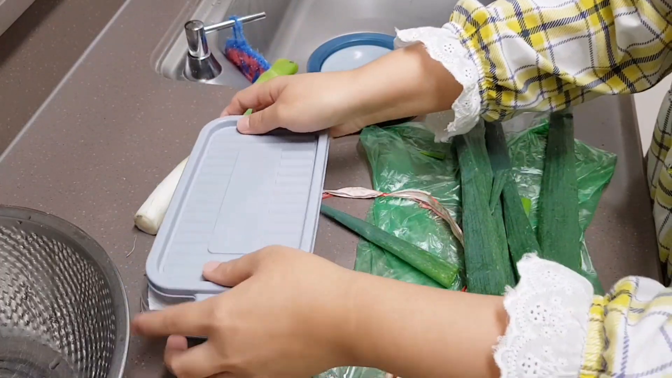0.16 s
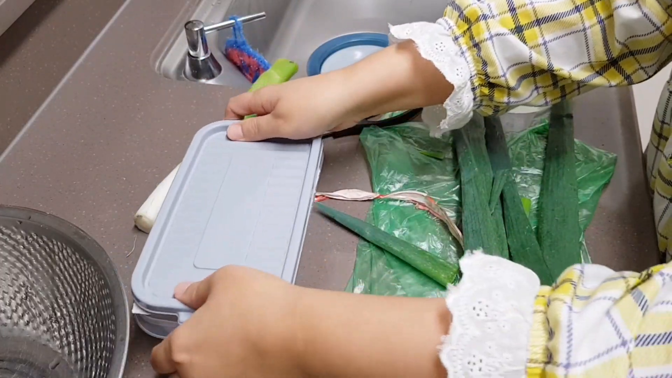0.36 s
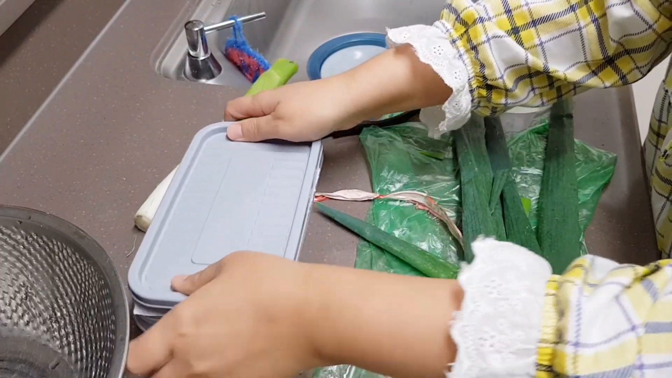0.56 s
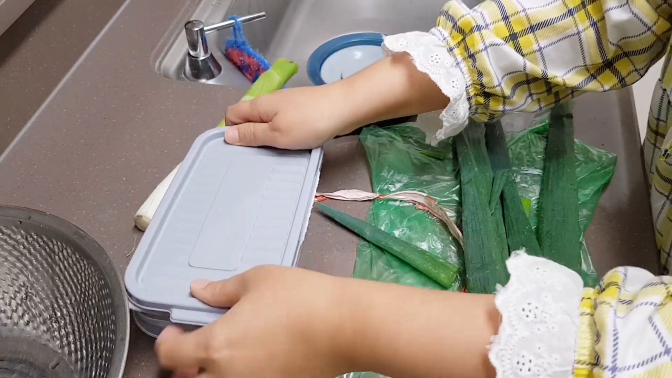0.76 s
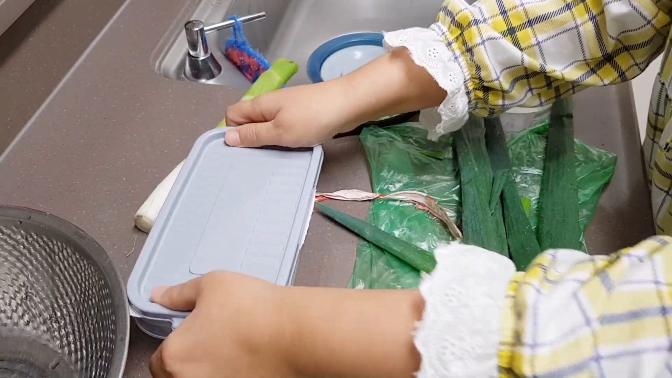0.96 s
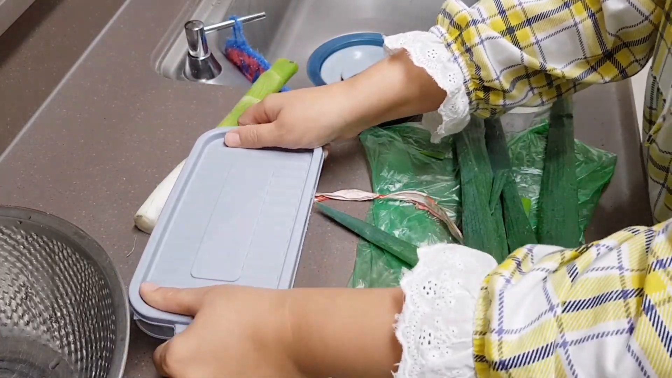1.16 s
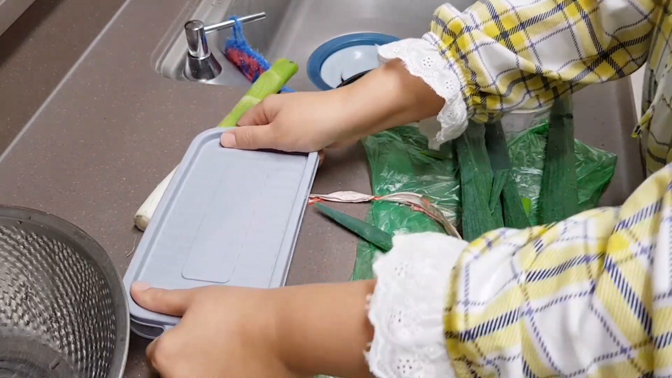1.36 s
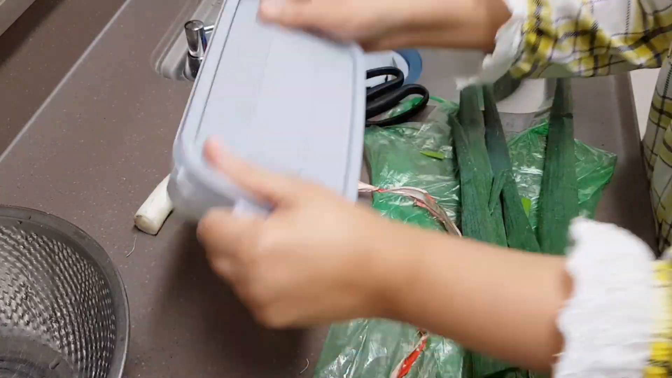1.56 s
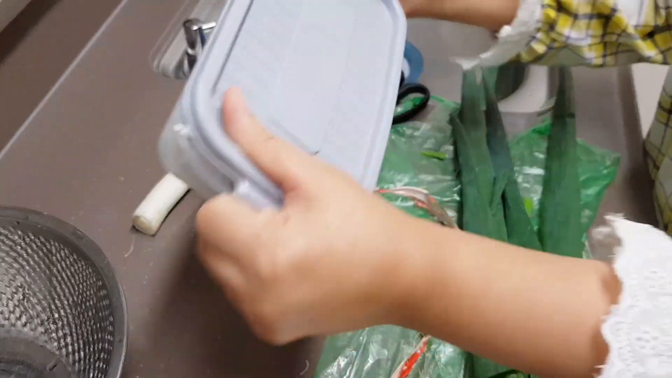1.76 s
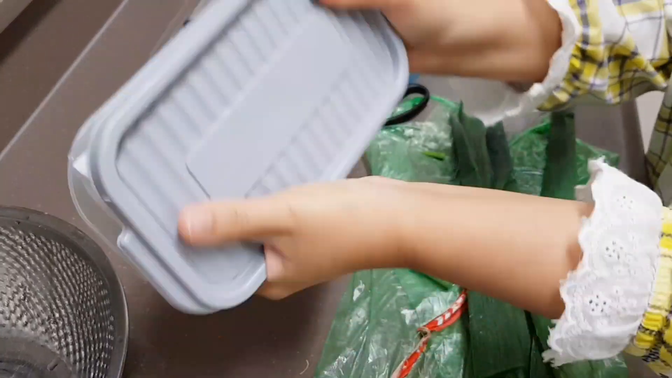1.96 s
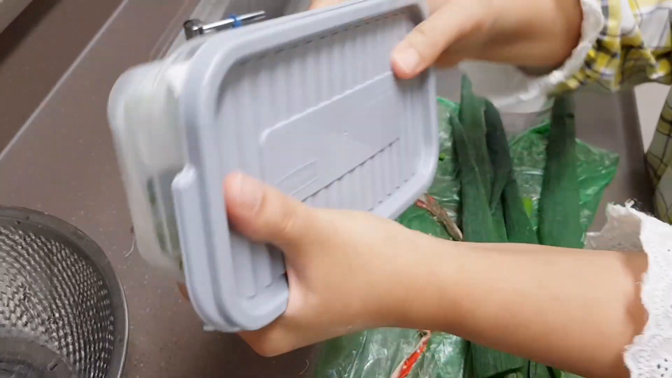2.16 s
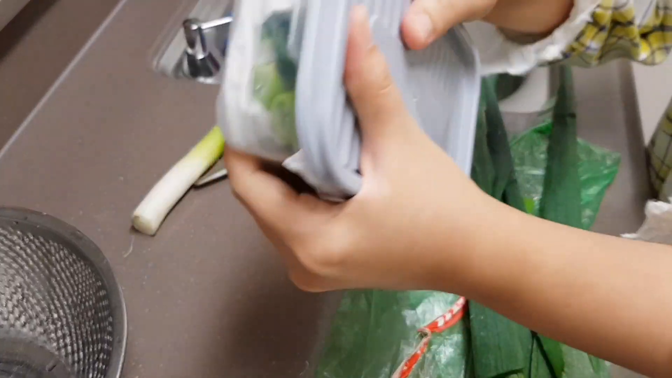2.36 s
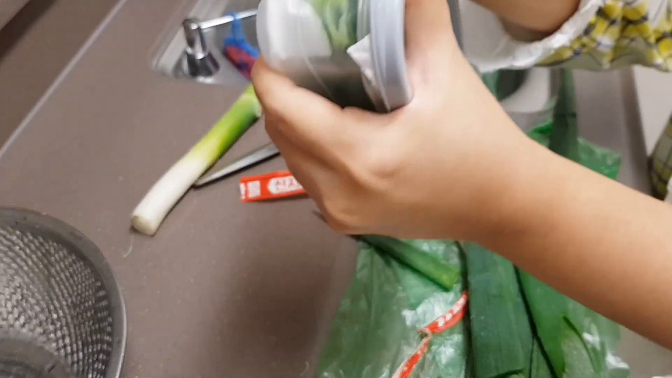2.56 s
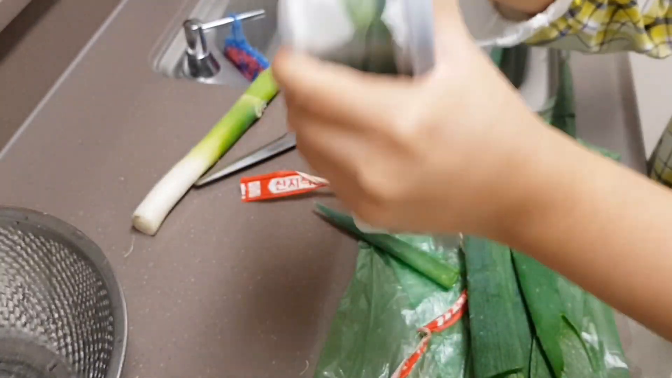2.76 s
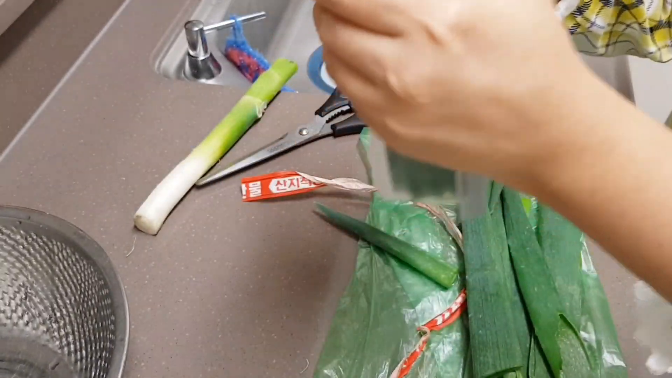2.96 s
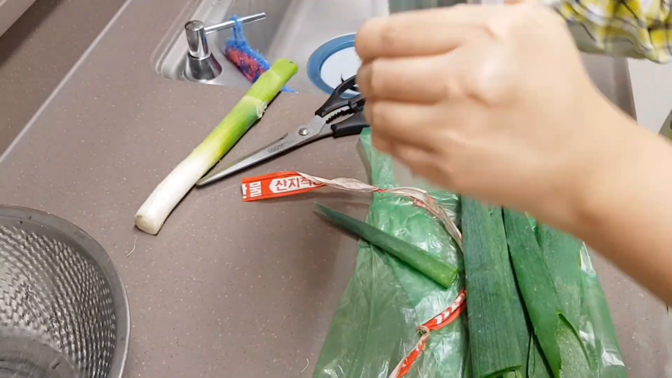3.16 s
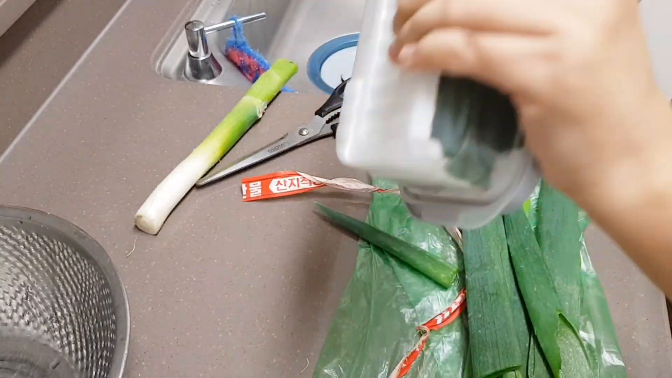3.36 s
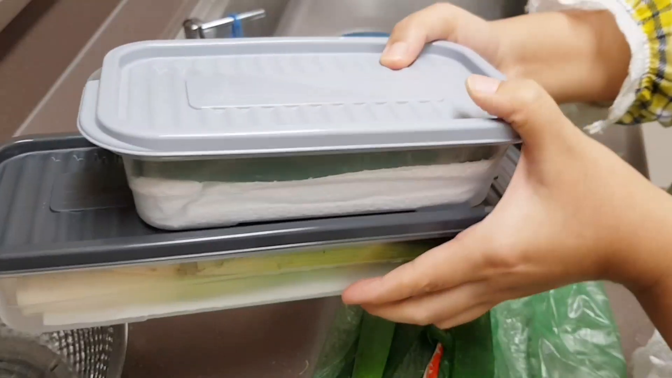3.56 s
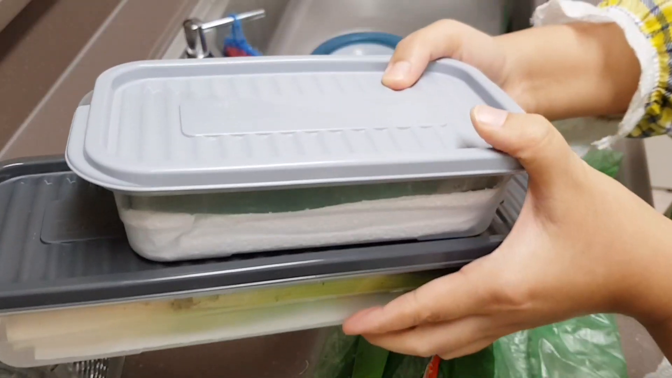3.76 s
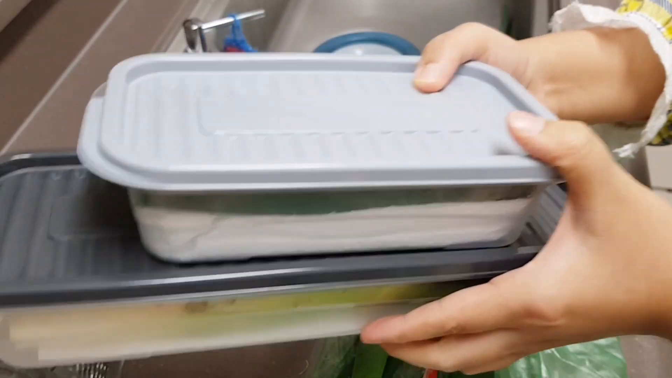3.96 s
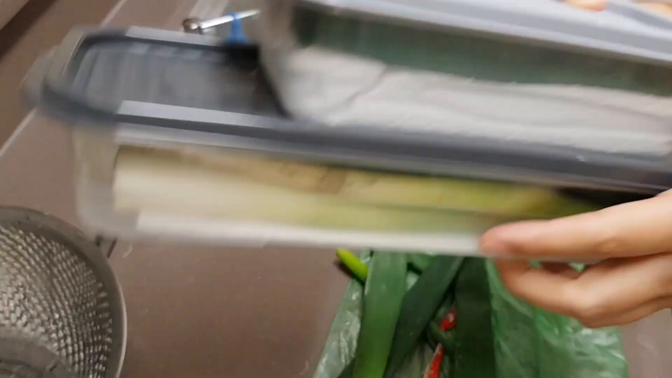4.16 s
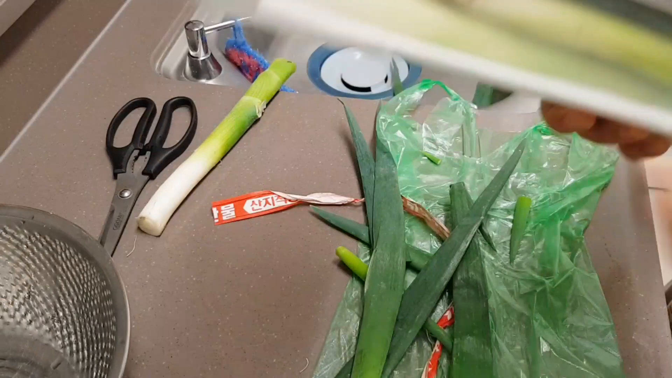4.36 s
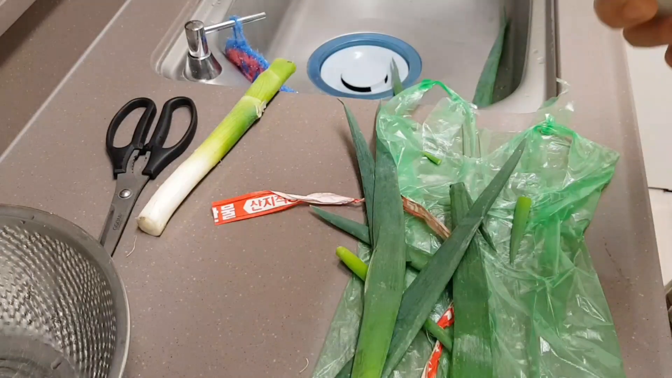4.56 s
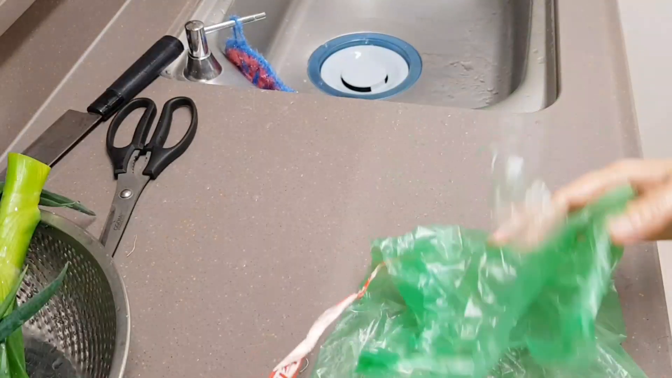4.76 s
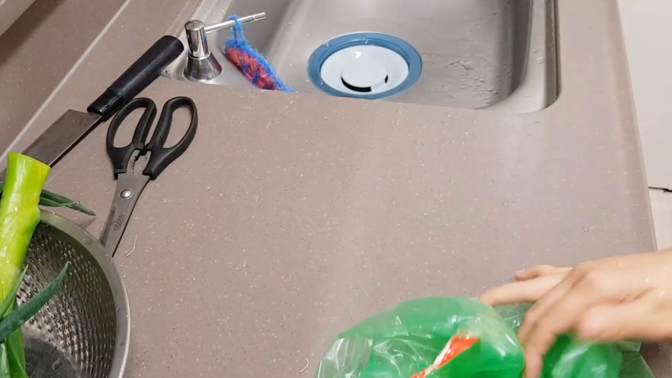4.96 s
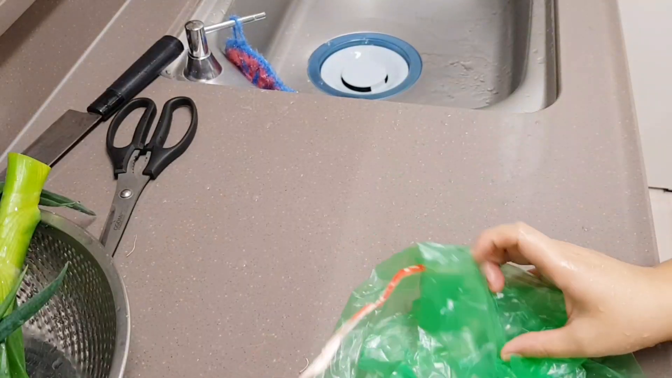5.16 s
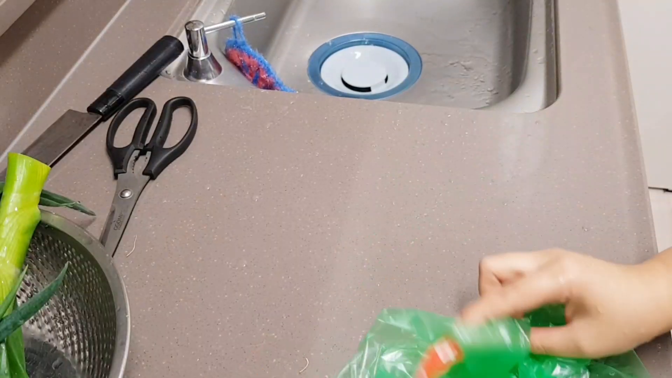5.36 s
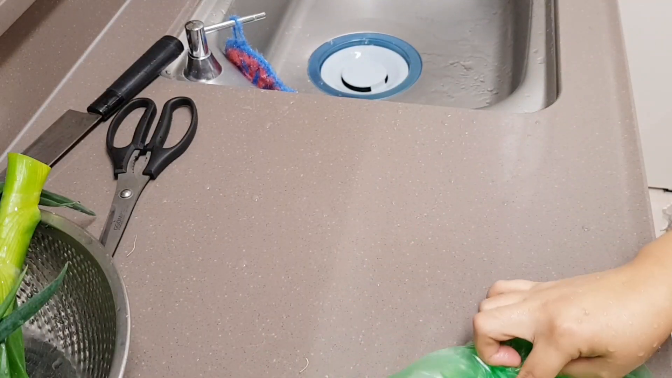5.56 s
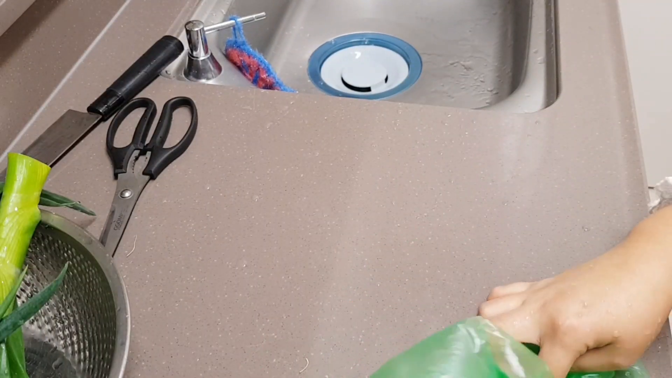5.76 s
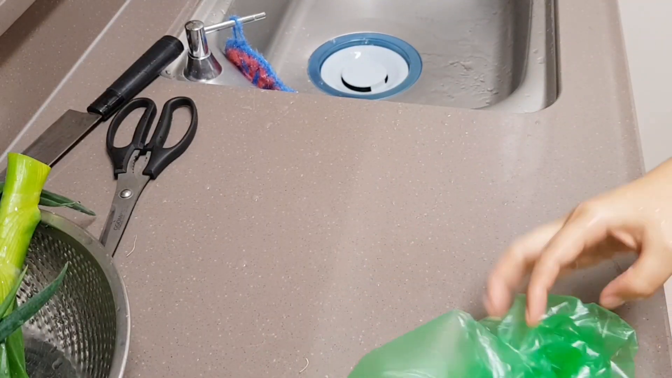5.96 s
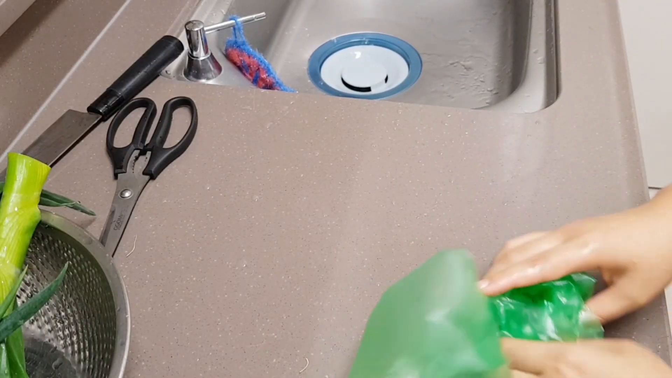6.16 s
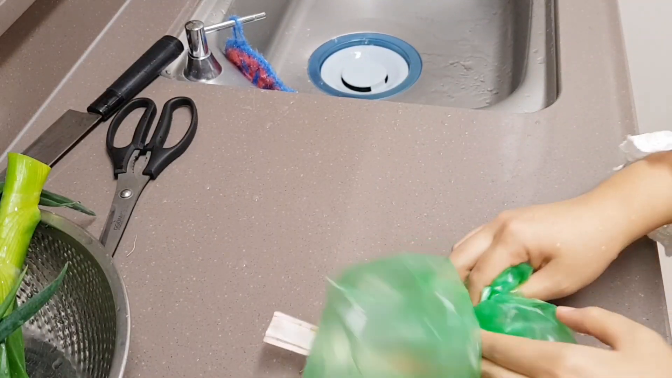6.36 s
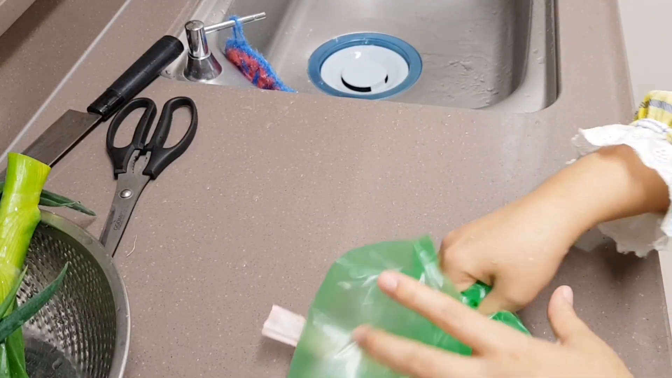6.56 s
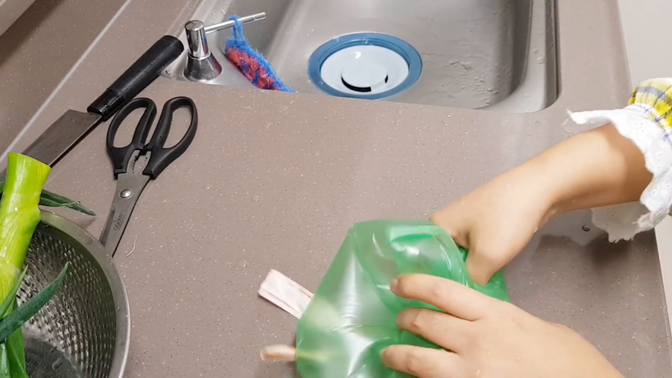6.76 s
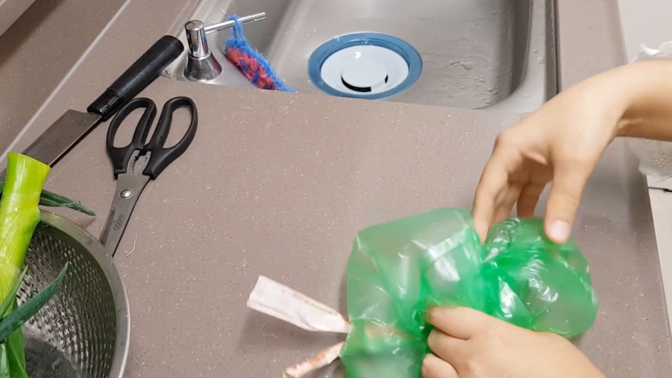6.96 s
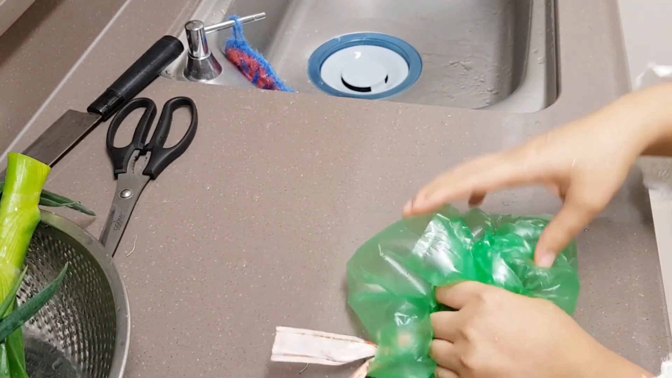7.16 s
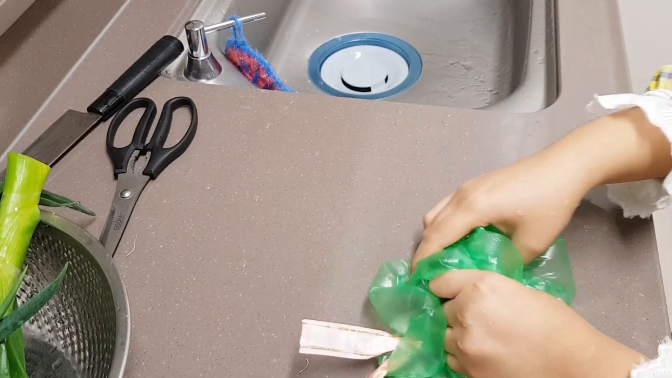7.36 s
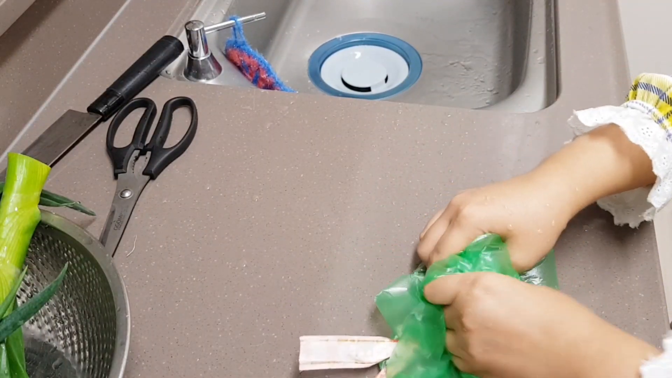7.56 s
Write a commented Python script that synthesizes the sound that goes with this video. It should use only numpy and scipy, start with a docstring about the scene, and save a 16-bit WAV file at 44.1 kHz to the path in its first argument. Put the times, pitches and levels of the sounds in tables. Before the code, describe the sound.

A small hard kitchen with low hum and faint hiss, heard closely, leaning slightly left. From 0 to 0.7 seconds sleeves and fingers brush softly over a low rumble, with faint dull bumps. At 0.73 a plastic lid latches with a hollow clack, jolting a steel utensil that chatters and rings briefly. Smaller knocks follow to 1.1, then rubbing and swishing around 1.2 to 1.6. Between 1.75 and 2.8 the box is turned, with thumps, short clacks and brisk swishes, a sharp one near 2.55. From 3 it is nearly quiet, only faint brushes, with tiny total dropouts at 3.52 and 4.81. Then a thin plastic bag crackles close by, in dense bright snaps, squeezed repeatedly, stronger from 5.9, with low crunches and air puffs heaviest around 6.7 to 7.1 and another crunch at 7.45, still crackling at the end.

```python
"""A plastic box of cut green onions is latched shut, lifted and turned over at a kitchen counter.
Knocks set off decaying tones and noise; a steel utensil rings once; bursts of tiny snaps make sleeves and
fingers brush along, joined by short swells of noise at one pitch. After two short silent gaps a thin plastic
bag is crumpled close by, as a dense stream of snaps. A small hard room answers, over rumble, hum and hiss."""
import sys
import numpy as np
from scipy import signal
from scipy.fft import rfft, irfft, next_fast_len
from scipy.io import wavfile
from scipy.ndimage import uniform_filter1d, map_coordinates

SR = 44100
rng = np.random.default_rng(int(sys.argv[2]) if len(sys.argv) > 2 else 0)


def pcm_store(signal):
    """Save signal as 16-bit PCM."""
    levels = np.round(np.clip(np.atleast_2d(signal), -1, 1) * 32767)
    wavfile.write(sys.argv[1], SR, levels.astype(np.int16).T)


N = 335589
TIME = np.arange(N) / SR  # seconds since the start
AGE = np.arange(SR // 2) / SR  # seconds since a single blow
TOP_HZ = 16100  # nothing is heard above this

# Latches and knocks on the box. Each row: start in seconds, level in dB before a shared trim, clack pitch in Hz,
# seconds for the ring to fall 60 dB, then thump, hollow, click and slide, each in dB over the level.
KNOCKS = [(0.728, -30, 1310, 0.21, -17.5, -.5, -13, -40.5), (0.841, -41.5, 980, 0.17, 0.5, 0.5, -1, -29),
          (1.045, -58, 960, 0.25, -18, -5, -11, -26), (1.116, -40.5, 1030, 0.11, -17, -5, -11.5, -15.5),
          (1.755, -42, 1030, 0.3, 2.5, 0, -1.5, -20), (1.786, -33, 1580, .086, -5.5, -5.5, -13, -21.5),
          (1.933, -39, 713, 0.22, -1.5, -8, -9, -32), (1.992, -40.5, 1190, .15, 11.5, -1, 8.5, -5.5),
          (2.136, -57.5, 890, .12, 11.5, 5.5, 6, -8), (2.362, -37.5, 1360, 0.052, -6.5, 6, 0, -28.5),
          (2.373, -38.5, 1480, 0.071, -7.5, 5.5, 4.5, -29), (2.546, -27.5, 1990, 0.073, -6, -4, -4, -32.5),
          (2.783, -37.5, 1400, 0.069, 0, -12, 2, -35), (2.925, -53, 1450, 0.13, -21, 1, 6.5, -17.5),
          (3.124, -53, 1500, 0.17, -17, -3.5, -0.5, -0.5)]
# Tones of the box and its lid. Each row: pitch in Hz, typical strength in dB (each blow varies it),
# seconds to fall 60 dB in an ordinary grip.
BOX_MODES = [(346.5, 5.5, 0.031), (378.1, -2, 0.12), (434, 9.5, 0.0077), (545, -12, 0.12), (745, -9, 0.087),
             (861, -0.5, 0.0532), (1080, -7.5, 0.013), (1210, -14.5, 0.12), (1370, 1.5, 0.024),
             (1674, -12.5, 0.18), (1950, -9.5, 0.16), (2007, -26.5, 0.073), (2500, -28, 0.051),
             (2670, -28, 0.039)]
# Box and hands bump softly on the counter. Each row: start in seconds, pitch in Hz, level in dB,
# seconds to fall 60 dB.
BUMPS = [(0.435, 82, -54.5, 0.58), (0.547, 85.5, -52, 0.35), (0.594, 80, -52, 0.35),
         (0.962, 67.8, -47, 0.13), (5.89, 87, -51.5, 0.42), (6.13, 71, -52, 0.27)]
THUMP_HZ, THUMP_DB_PER_OCTAVE = 203.8, 32.5  # a heavier thump is lower
# a loose grip lets the box ring on and the rim rattle
RATTLE_DB, RATTLE_DB_PER_DOUBLING, LOOSE_T60_S = -4.5, 9, 0.14
BOX_LEFT_DB = 2.5  # on top of the lean shared by the hands


def box():
    """Each blow thumps the contents, rings the hollow box and its lid, and clicks at the rim."""
    track = np.zeros((2, N))
    for s, db, clack_hz, t60, thump_db, hollow_db, click_db, _ in KNOCKS:
        loose = t60 / LOOSE_T60_S
        # every blow finds the tones at new strengths; the grip sets how long they ring
        shell = 0
        for hz, mode_db, life in BOX_MODES:
            strength = rng.choice([-1, 1]) * amp(mode_db + rng.normal(0, 5.0))
            shell = shell + strength * ring(hz, life * loose)
        thump_hz = THUMP_HZ * 2 ** (-thump_db / THUMP_DB_PER_OCTAVE)
        thump = band(ring(thump_hz, 0.053) + 3 * dying(0.095)[0], 54, 270)
        hollow = band(shell + 2.1 * dying(t60)[0], 270, 570)
        clack_mix = shell + 3 * dying(t60) + 6 * dying(0.0057)[0]
        clack = band(clack_mix, clack_hz / 1.64, clack_hz * 1.47)
        # the rim clicks and may rattle on
        rattle_db = RATTLE_DB + RATTLE_DB_PER_DOUBLING * np.log2(loose)
        rim = band(dying(0.0059) + amp(rattle_db) * dying(0.11), 3100, 14000)
        click = signal.lfilter([.6], [1, -.5], rim)  # the soft plastic rounds off the top
        blow = clack + amp(thump_db) * thump + amp(hollow_db) * hollow + amp(click_db) * click
        add(track, s, amp(db - 4.5) * blow)
    for s, hz, db, t60 in BUMPS:
        soft_start = 1 - np.exp(-AGE / 0.0042)
        add(track, s, amp(db) * ring(hz, t60) * soft_start)
    return kitchen(track * sides(BOX_LEFT_DB), wet_db=-9.5)


# Tones of the steel utensil. Each row: pitch in Hz, level in dB at the blow, seconds to fall 60 dB.
STEEL_TONES = [(970, -25, 0.12), (1480, -46, 0.74), (1720, -39, 0.28), (1870, -39, 0.46), (2050, -48, 0.39),
               (2230, -34.5, 0.32), (2510, -40.5, 0.3), (3070, -39, 0.25), (3370, -56.5, .26),
               (3920, -37.5, 0.18), (4110, -40, 0.25), (4570, -65.5, .16)]


def steel():
    """The first latch jolts a steel utensil, which chatters and rings on as damped tones."""
    shared_phases = rng.uniform(0, 2 * np.pi, (len(STEEL_TONES), 1, 1))
    phases = shared_phases + rng.normal(0, 0.47, (len(STEEL_TONES), 2, 1))  # left and right differ a little
    tones = 0
    for (hz, db, t60), phase in zip(STEEL_TONES, phases):
        tones = tones + amp(db - 60 * AGE / t60) * np.sin(2 * np.pi * hz * AGE + phase)
    chatter = amp(-33.0) * band(dying(0.21), 1500, 5000)
    soft_start = 1 - np.exp(-AGE / 0.0033)
    track = np.zeros((2, N))
    add(track, KNOCKS[0][0], (tones + chatter) * soft_start * sides(2.8))
    return track


# Strokes of sleeves and fingers. Each row: peak time in seconds, half length in seconds,
# swish level in dB, rub in dB over the swish, both before shared trims.
STROKES = [(0.107, 0.061, -64, -2), (0.397, .02, -66, 13), (0.467, 0.035, -57, 9), (0.702, .03, -65.5, 2.5),
           (0.915, 0.059, -74.5, 19), (1.19, 0.074, -61, 9), (1.324, 0.0083, -62, -10),
           (1.453, 0.043, -52.5, 3), (1.585, 0.048, -53, -9), (2.24, .05, -60, -2.5),
           (2.324, .05, -55, -13), (2.405, .025, -52.5, -5), (2.501, 0.044, -51, -2),
           (2.647, 0.049, -53, -30), (2.768, .018, -60, -22), (2.924, .022, -55.5, -20),
           (3.331, .04, -65.5, -0.5), (3.474, 0.067, -66.5, 1), (4.194, 0.046, -68, 5),
           (4.373, 0.082, -75.5, 2), (4.657, .035, -68.5, 7)]
# Colour of the bright swish. Each row: pitch in Hz, relative level in dB.
SWISH = [(1200, -10.5), (2200, 2.5), (3200, 0), (4600, 5.5), (7000, 8), (9300, 2.5), (13000, 6.5),
         (16000, -1.5)]
# Colour of the dull rub. Each row: pitch in Hz, relative level in dB.
RUB = [(150, -4.5), (280, -4), (480, 2.5), (750, -5), (1200, -8.5), (1900, -10.5), (2800, -19.5),
       (4000, -23.5), (7000, -50.5)]
SLIDE_DELAY_S, SLIDE_HALF_S, SLIDE_RUB_DB = 0.054, 0.032, -11.5  # stalks and fingers settle after a knock
# faint random brushing while the hands work, before the shared trims
FIDGET_DB, FIDGET_RUB_DB, FIDGET_SWING_DB, FIDGET_PER_S = -76, 10, 0.5, 7
# then the faint random brushing fades out and only separate strokes remain
FIDGET_END_S, FIDGET_FADE_S = 3.09, 0.27
SLEEVES_LEFT_DB = 2.5  # on top of the lean shared by the hands


def sleeves():
    """Cloth, fingers and stalks brush the box in fine slips: in strokes, after each knock and faintly between."""
    slides = [(s + SLIDE_DELAY_S, SLIDE_HALF_S, db + slide_db, SLIDE_RUB_DB) for s, db, *_, slide_db in KNOCKS]
    busy = np.clip((FIDGET_END_S - TIME) / FIDGET_FADE_S + 1, 0, 1)
    swish_power = (busy * amp(FIDGET_DB + FIDGET_SWING_DB * wobble(FIDGET_PER_S))) ** 2
    rub_power = swish_power * amp(FIDGET_RUB_DB) ** 2
    for s, half, db, rub_db in STROKES + slides:
        power = (amp(db) * swell(s, half)) ** 2
        swish_power = swish_power + power
        rub_power = rub_power + power * amp(rub_db) ** 2
    slips = grains(rate=7000, spread_db=-1.0) * amp(1.8 * wobble(60))
    slips = patchy(slips, depth_db=3.5, per_second=28)
    swish = amp(3) * np.sqrt(swish_power) * coloured(slips, SWISH)
    rub = amp(-0.7) * np.sqrt(rub_power) * coloured(slips, RUB)
    return kitchen(swish + rub, wet_db=-9.5) * sides(SLEEVES_LEFT_DB) * (TIME < GAPS[1][1])


# Short swells at one pitch: judders on the plastic, the hollow box sounding again, the bright edge of a stroke.
# Each row: peak time in seconds, half length in seconds, pitch in Hz, level in dB.
PITCHED_SWELLS = [(0.134, 0.021, 1670, -64), (0.397, .04, 746, -56.5), (0.456, 0.0073, 1950, -56),
                  (1.678, .015, 2420, -60), (2.406, .022, 363, -39.5), (4.194, .03, 2500, -75),
                  (4.324, 0.045, 1630, -72.5), (4.658, 0.03, 1120, -61.5)]


def pitched_swells():
    """Noise through two resonant peaks at one pitch swells and fades briefly."""
    track = np.zeros(N)
    for s, half, hz, db in PITCHED_SWELLS:
        tone = signal.lfilter(*signal.iirpeak(hz, Q=7, fs=SR), rng.standard_normal(N))
        tone = signal.lfilter(*signal.iirpeak(hz, Q=2, fs=SR), tone)
        track += amp(db) * swell(s, half) * unit(tone)
    return kitchen(track * sides(4.08), wet_db=-9.5)


# Squeezes of the bag. Each row: peak time in seconds, half length in seconds, crinkle in dB before a trim.
SQUEEZES = [(5.05, 0.079, -39.5), (5.15, 0.042, -37.5), (5.261, 0.079, -39.5), (5.474, 0.084, -39),
            (5.646, 0.053, -38), (5.797, 0.096, -38.5), (5.883, 0.059, -34.5), (6.04, 0.1, -34.5),
            (6.297, 0.099, -33), (6.377, 0.053, -36), (6.508, 0.073, -34), (6.744, 0.039, -32),
            (6.936, 0.19, -37), (7.019, .025, -34), (7.082, 0.076, -35.5), (7.343, 0.0855, -40.5),
            (7.475, 0.14, -38)]
# How tightly the wad is packed. Each row: time in seconds, low crunch in dB over the crinkle, before trims.
PACKING = [(4.85, -9), (5.1, -10.5), (5.35, -7), (5.8, -8.5), (6.4, -5), (6.65, -11.5), (6.82, -1.5),
           (7.05, -1.5), (7.6, -5)]
# Folds that give way at once. Each row: start in seconds, crunch level in dB, air puff level in dB.
FOLDS = [(5.866, -41, -51), (6.032, -35.5, -59), (6.376, -40, -44), (6.71, -38.5, -64), (6.82, -47, -42.5),
         (6.998, -38, -40), (7.049, -35, -36.5), (7.066, -33.5, -48), (7.45, -31.5, -48.5)]
# Colour of the film's crinkle. Each row: pitch in Hz, relative level in dB.
CRINKLE = [(1470, -16.5), (2500, -2.5), (4880, 0), (7250, 1), (8870, -3), (12000, 1.5), (15200, -1),
           (16000, -23.5)]
# Colour of the wad's low crunch. Each row: pitch in Hz, relative level in dB.
CRUSH = [(190, -23), (330, -25.5), (500, 1.5), (700, 1), (1000, 5), (1600, 5), (2300, 1), (3200, -6),
         (4200, -9.5), (7000, -53)]
# Colour of the air pressed out. Each row: pitch in Hz, relative level in dB.
AIR = [(25, -26), (60, -17), (110, -1.5), (200, 2.5), (380, 8.5), (550, 9), (900, -61)]
HOLD_DB = -41  # the film crackles on between squeezes; before the same trim
AIR_DB, AIR_GROWS = -53.5, 1.1  # trapped air at the average crunch; dB more for each dB of crunch


def bag():
    """Creases buckle by the thousand, more when squeezed harder; the wad crunches lower and puffs out air."""
    power = amp(HOLD_DB) ** 2
    for s, half, db in SQUEEZES:
        power = power + (amp(db) * swell(s, half)) ** 2
    in_hand = TIME > GAPS[1][1]
    crinkle_db = 10 * np.log10(power)
    crush_db = crinkle_db + curves(PACKING)[0]
    air_db = AIR_DB + AIR_GROWS * (crush_db - np.mean(crush_db[in_hand]))
    rate = 10000 * amp(.5 * (crinkle_db - HOLD_DB))  # snaps a second
    snaps = grains(rate, spread_db=3.0) * amp(1.7 * wobble(70) + 0.81 * wobble(400))
    # bending waves in the film spread each snap over a millisecond, the treble first
    snaps = filtered(snaps, lambda hz: np.exp(1j * np.pi * .001 * (hz - TOP_HZ) ** 2 / TOP_HZ))
    creases = patchy(kitchen(snaps, wet_db=0), depth_db=1.5, per_second=55)
    film = amp(crinkle_db + 3) * coloured(creases, CRINKLE)
    wad = amp(crush_db + 0.73 + 0.3 * wobble(31)) * coloured(creases, CRUSH)
    air = amp(air_db + 1.6 * wobble(25)) * coloured(rng.standard_normal((2, N)), AIR)
    folds = np.zeros((2, N))
    for s, db, puff_db in FOLDS:
        crunch = band(dying(0.097), 490, 3200) + 0.65 * band(dying(.04), 4700, 13000)
        puff = band(ring(204, 0.025) + 4 * dying(0.14)[0], 180, 510)
        add(folds, s, amp(db) * crunch + amp(puff_db) * puff)
    return (film + wad + air + kitchen(folds, wet_db=-5.5)) * in_hand


# The weight of the arms and box. Each row: time in seconds, middle level of the rumble in dB.
HANDLING = [(0.0, -59), (0.32, -61), (0.61, -57), (1.54, -76), (2.17, -59.5), (2.7, -61.5), (3.4, -71.5),
            (4.8, -77)]
# Colour of the rumble. Each row: pitch in Hz, relative level in dB.
RUMBLE = [(15, -36), (25, -16), (54, -2.5), (70, 1.5), (84, -7.5), (135, -20), (236, -18.5), (300, -26),
          (390, -55.5), (660, -120)]


def handling():
    """The arms and the box they carry rumble through the counter: low noise of wavering level."""
    rumble_db, = curves(HANDLING)
    rumble = coloured(rng.standard_normal((2, N)), RUMBLE)
    return amp(rumble_db + 2.5 * wobble(12)) * rumble * (TIME < GAPS[1][1])


# Colour of the room's hum. Each row: pitch in Hz, relative level in dB.
HUM = [(15, -50), (25, -21), (49, -14), (76, -6), (99, -8.5), (118, -19.5), (245, -16.5), (275, -15),
       (298, -27.5), (341, -9), (389, -12), (1300, -41.5), (1690, -72.5), (2860, -120)]
# Colour of the faint hiss. Each row: pitch in Hz, relative level in dB.
HISS = [(600, -5.5), (1200, 5), (2500, -1), (5000, -4), (9000, -9.5), (12000, -1), (16000, -4.5)]


def room_tone():
    """Steady low noise makes the hum of the room, stronger on the left; brighter noise makes a faint hiss."""
    hum = amp(-68) * coloured(rng.standard_normal((2, N)), HUM) * sides(5.4)
    hiss = amp(-81.0) * coloured(rng.standard_normal((2, N)), HISS)
    return hum + hiss


# How long the kitchen lingers. Each row: pitch in Hz, seconds to fall 60 dB.
KITCHEN = [(100, 0.2), (500, 0.29), (2000, 0.21), (6000, 0.83), (15000, 0.13)]


def kitchen(x, wet_db):
    """x plus the diffuse answer of counter and walls: noise whose energy dies at its own pace in each band."""
    hz, t, z = signal.stft(x, SR, nperseg=256)
    keep = amp(-60 * t[1] / along(KITCHEN, hz)) ** 2  # energy left after one step
    power = np.mean(np.abs(z) ** 2, axis=0)
    energy = np.array([signal.lfilter([0, 0, 1 - k], [1, -k], row) for k, row in zip(keep, power)])
    scatter = signal.stft(rng.standard_normal(x.shape), SR, nperseg=256)[2]
    scatter = ears(scatter / np.std(scatter), hz[:, None])
    wet = signal.istft(scatter * np.sqrt(energy), SR, nperseg=256)[1]
    return x + amp(wet_db) * wet[:, :N]


# How alike the two ears are. Each row: pitch in Hz, likeness from 0 (unrelated) to 1 (the same).
ALIKE = [(60, .97), (250, .93), (500, .7), (1000, .48), (2000, .2), (4000, .03), (12000, .02)]


def ears(pair, hz):
    """Two unrelated spectra to left and right: the bass is alike in both ears, the treble is not."""
    turn = np.arccos(np.clip(along(ALIKE, hz), -1, 1)) / 2
    mid, side = pair[0] * np.cos(turn), pair[1] * np.sin(turn)
    return np.array([mid + side, mid - side])


def coloured(pair, spectrum):
    """Two unrelated signals to stereo of rms 1, filtered by the given spectrum."""
    size = next_fast_len(N + 8192)
    hz = np.fft.rfftfreq(size, 1 / SR)
    shaped = ears(rfft(pair, size), hz) * amp(along(spectrum, hz))
    return unit(irfft(shaped, size)[:, :N])


def patchy(x, depth_db, per_second):
    """Ever different narrow bands are favoured, per_second new shapes a second."""
    hz, t, z = signal.stft(x, SR, nperseg=512)
    row, column = np.meshgrid(hz / 260, t * per_second, indexing="ij")  # one random knot every 260 Hz
    knots = rng.standard_normal((int(row.max()) + 2, int(column.max()) + 2))
    field = map_coordinates(knots, [row, column], order=1)
    return signal.istft(z * amp(depth_db * unit(field)), SR, nperseg=512)[1][:, :N]


def grains(rate, spread_db):
    """Tiny snaps at random moments, rate a second, of unequal size, brought to rms 1."""
    sizes = amp(spread_db * np.clip(rng.standard_normal(N), -2.5, 2.5))
    happens = rng.random(N) < rate / SR
    return unit(happens * sizes * rng.standard_normal((2, N)))


def ring(hz, t60):
    """One damped sine."""
    return amp(-60 * AGE / t60) * np.sin(2 * np.pi * hz * AGE)


def dying(t60):
    """Two unrelated bursts of noise that die away."""
    return rng.standard_normal((2, len(AGE))) * amp(-60 * AGE / t60)


def swell(s, half):
    """The gain of a short swell: 1 at time s, about 0.37 half a length away."""
    return np.exp(-np.abs((TIME - s) / half) ** 1.5)


def wobble(rate):
    """A smooth random curve, rate knots a second."""
    return map_coordinates(rng.standard_normal(int(N * rate / SR) + 4), [TIME * rate])


def band(x, lo_hz, hi_hz):
    """Causal band-pass, brought to rms 1 over its first 30 ms."""
    edges = [lo_hz, min(hi_hz, SR / 2 - 100)]
    y = signal.sosfilt(signal.butter(N=3, Wn=edges, btype="band", fs=SR, output="sos"), x)
    return y / np.sqrt(np.mean(y[..., AGE < .03] ** 2))


def filtered(x, response):
    """x times a response of frequency."""
    size = next_fast_len(N + 8192)
    return irfft(rfft(x, size) * response(np.fft.rfftfreq(size, 1 / SR)), size)[..., :N]


def along(points, hz):
    """(Hz, value) points read on a log axis."""
    f, v = np.transpose(points)
    return np.interp(np.log(hz + 1), np.log(f + 1), v)


def curves(rows):
    """One value per sample for each column after the time."""
    s, *cols = np.transpose(rows)
    return [np.interp(TIME, s, c) for c in cols]


def add(track, s, sound):
    """Mix a sound into the track at time s."""
    part = track[:, round(s * SR):][:, :sound.shape[-1]]
    part += sound[..., :part.shape[-1]]


def sides(db):
    """Left and right gains for a level difference."""
    return amp([[db / 2], [-db / 2]])


def amp(db):
    """Decibels to gain."""
    return 10 ** (np.asarray(db) / 20)


def unit(x):
    """x at rms 1."""
    return x / np.sqrt(np.mean(x ** 2) + 1e-20)


# How far the hands' sounds lean left. Each row: pitch in Hz, left over right in dB.
LEAN = [(60, 7.5), (110, 6.5), (200, 2.5), (380, 1), (700, 2), (1290, 2), (2380, 2), (4400, 1.5), (8120, 3),
        (15000, 3.5)]


def scene():
    """Box, sleeves, rumble and bag lean left together; steel, pitched swells and room tone join them."""
    hands = box() + sleeves() + handling() + bag()
    hands = filtered(hands, lambda hz: amp(along(LEAN, hz) * np.array([[.5], [-.5]])))
    return hands + steel() + pitched_swells() + room_tone()


# Short silent gaps. Each row: start in seconds, end in seconds.
GAPS = [(3.519, 3.537), (4.811, 4.836)]


def record(dry):
    """The sound drops out in each gap, with softened edges; nothing is kept above the band limit."""
    kept = np.prod([(TIME < start) | (TIME > end) for start, end in GAPS], axis=0)
    gate = uniform_filter1d(kept * 1.0, size=60)
    return filtered(dry * gate, lambda hz: hz < TOP_HZ)


dry = scene()
out = record(dry)
pcm_store(out)
```